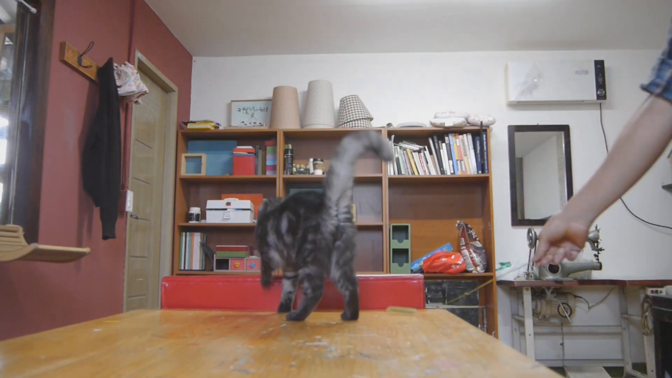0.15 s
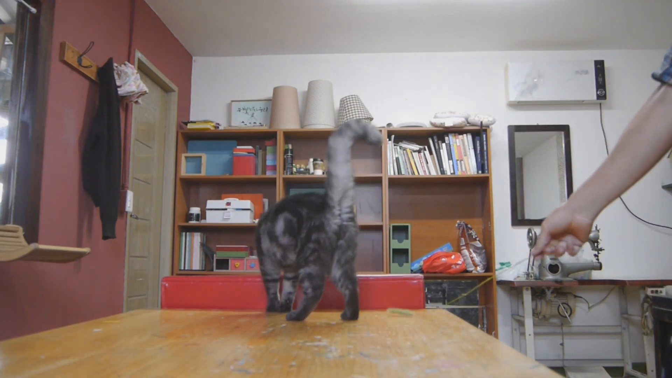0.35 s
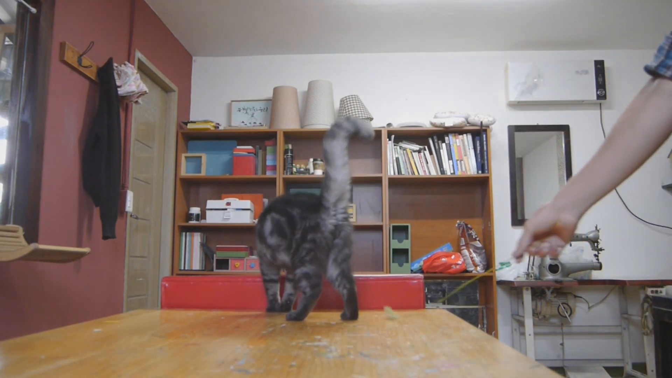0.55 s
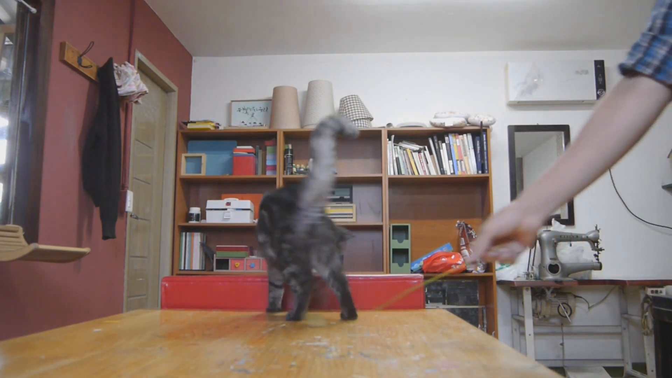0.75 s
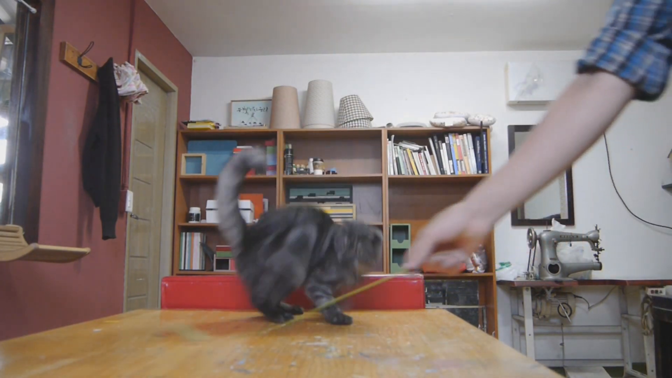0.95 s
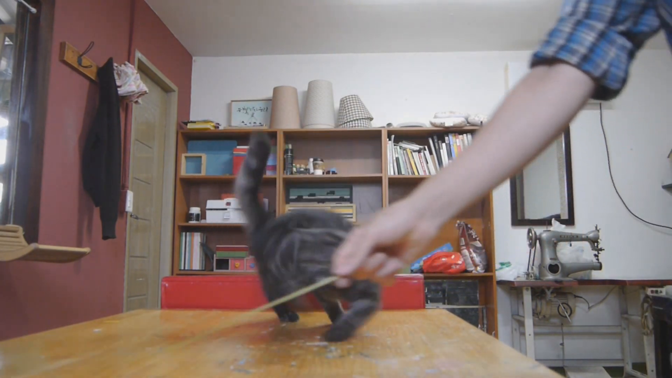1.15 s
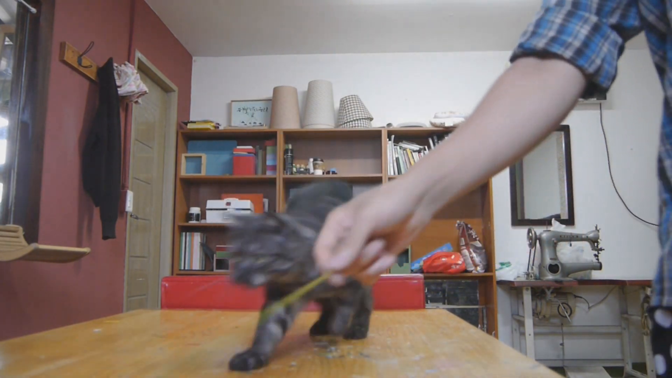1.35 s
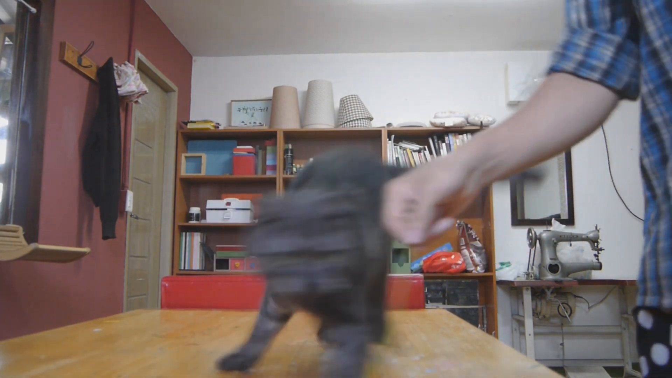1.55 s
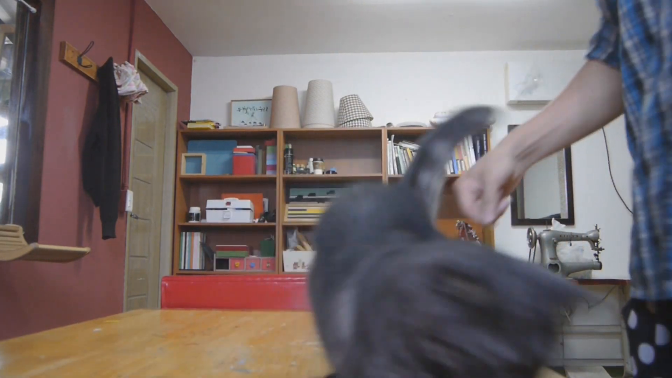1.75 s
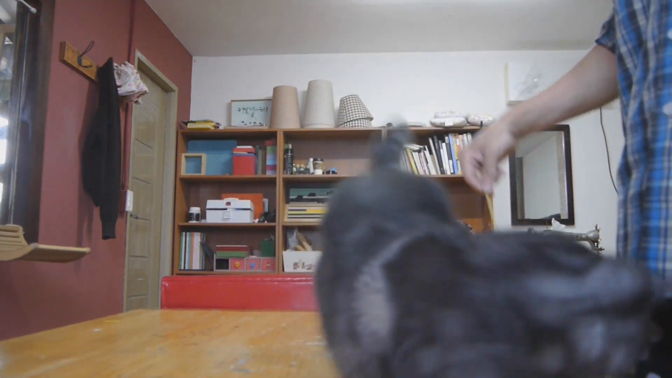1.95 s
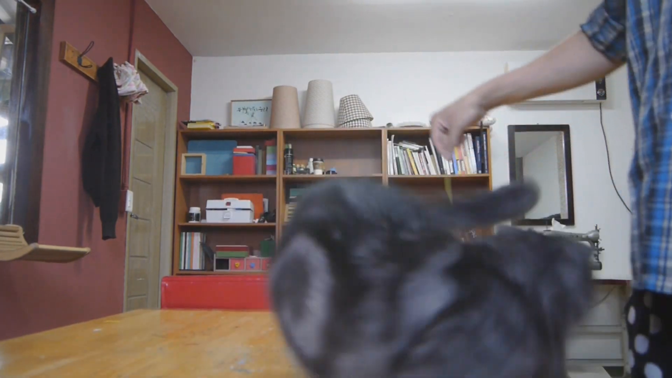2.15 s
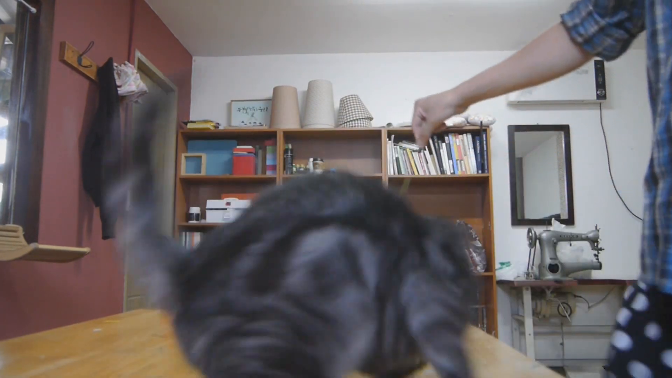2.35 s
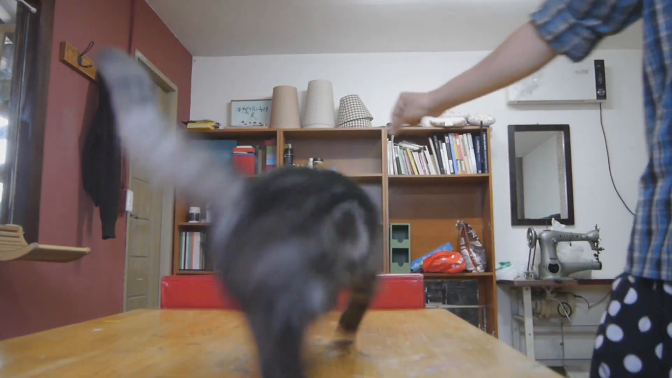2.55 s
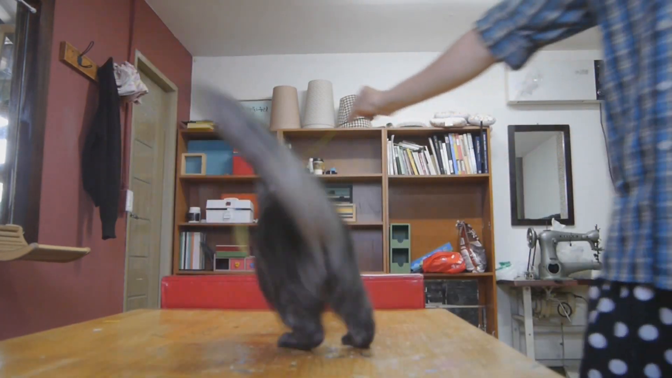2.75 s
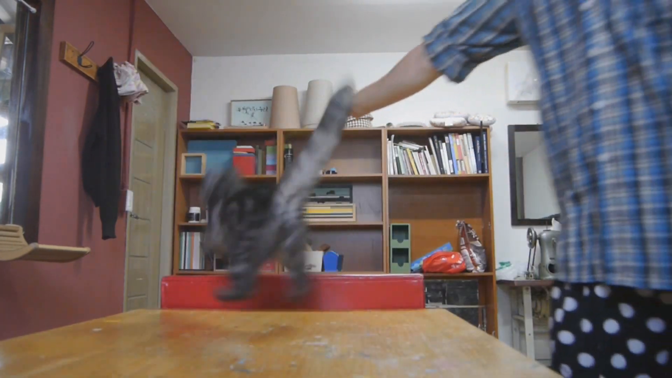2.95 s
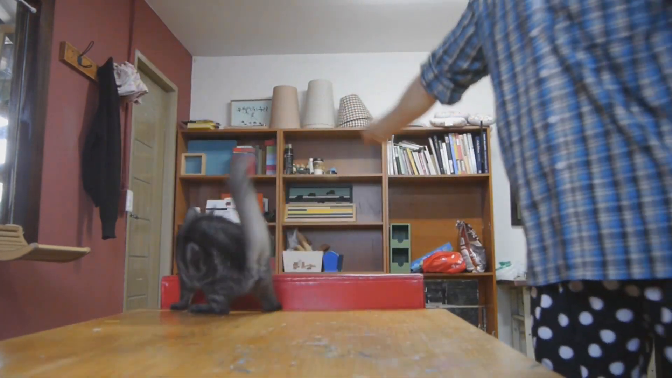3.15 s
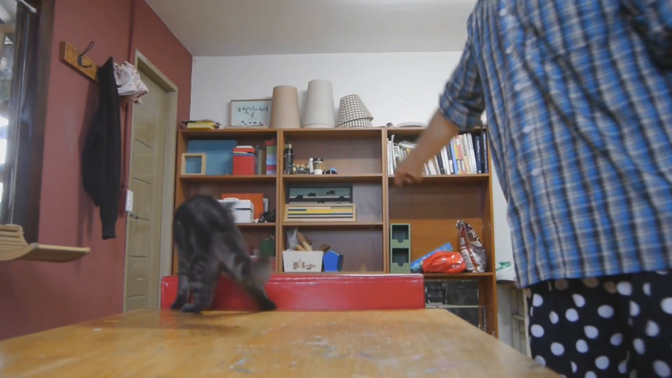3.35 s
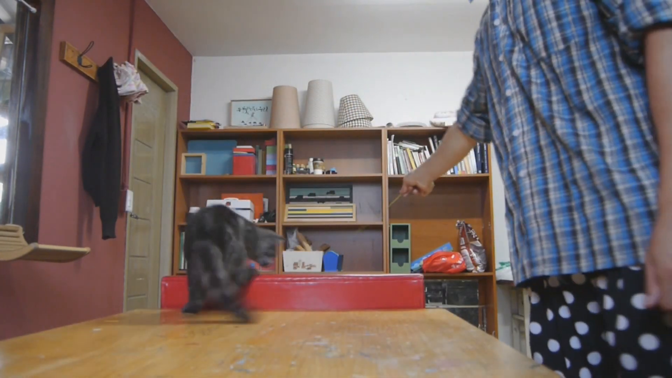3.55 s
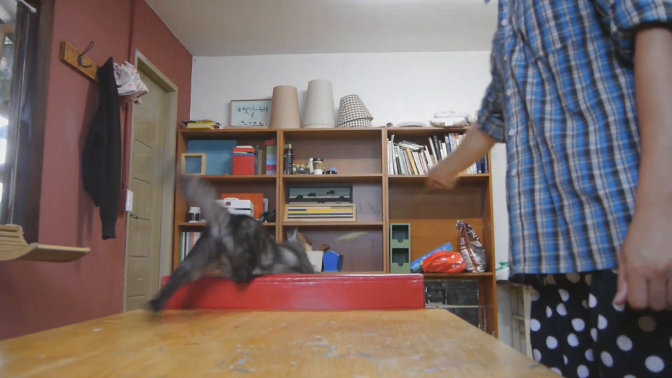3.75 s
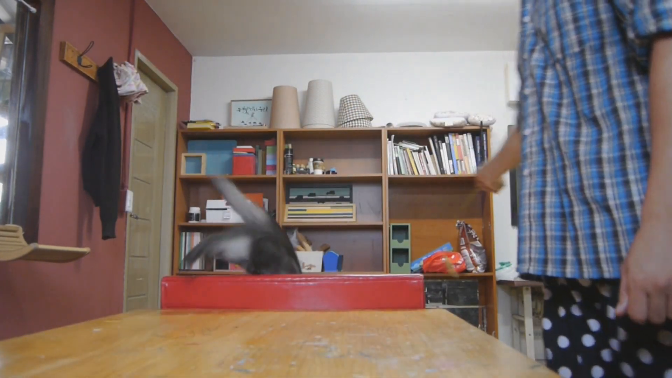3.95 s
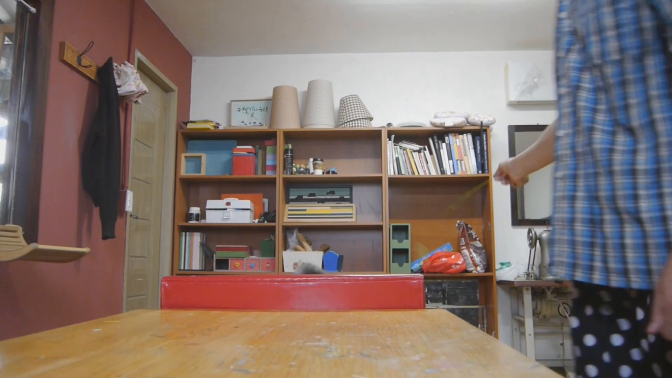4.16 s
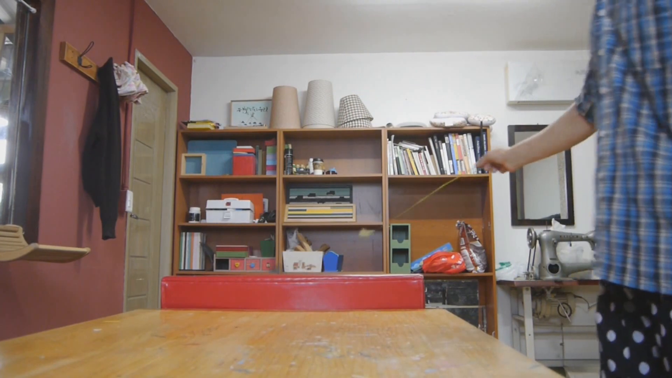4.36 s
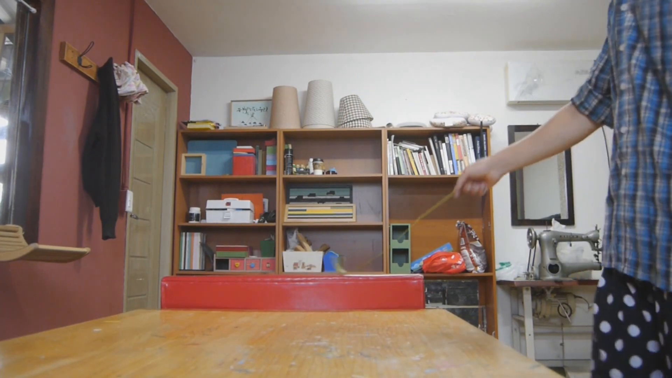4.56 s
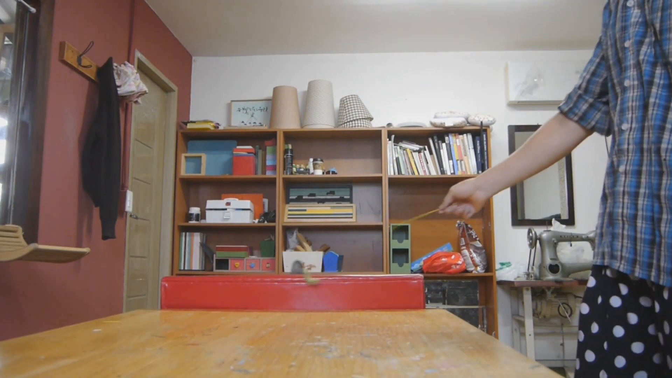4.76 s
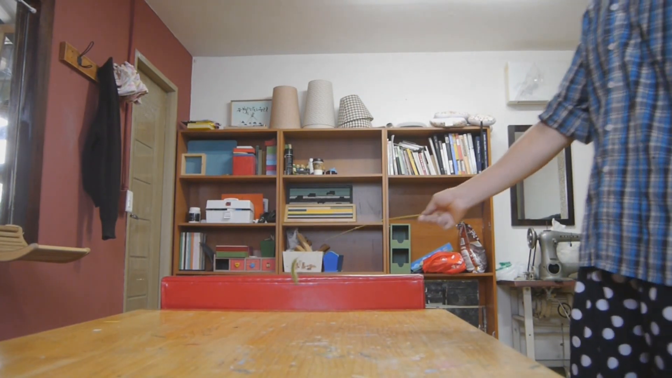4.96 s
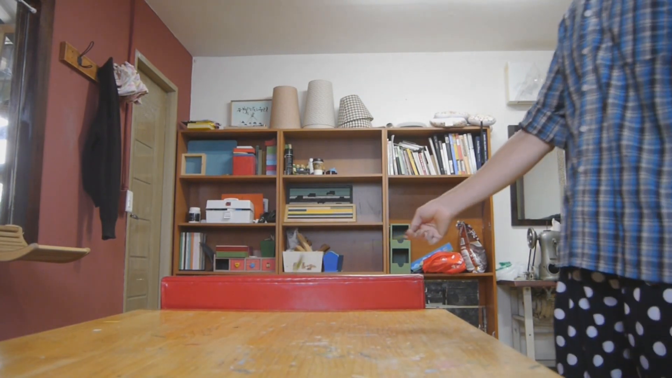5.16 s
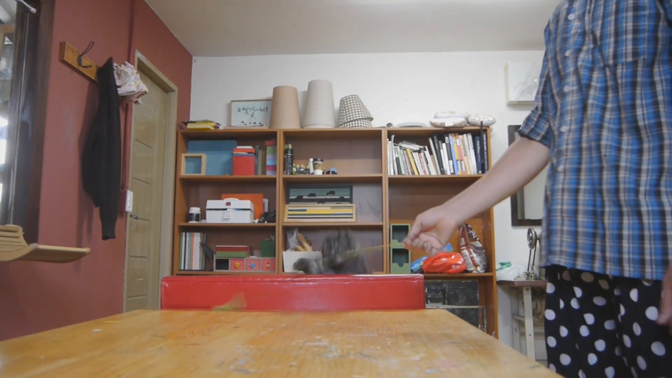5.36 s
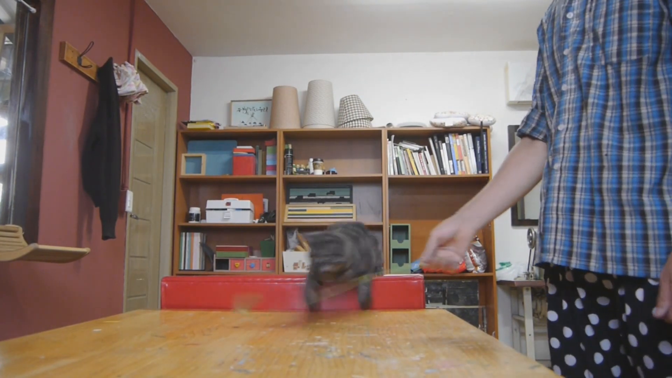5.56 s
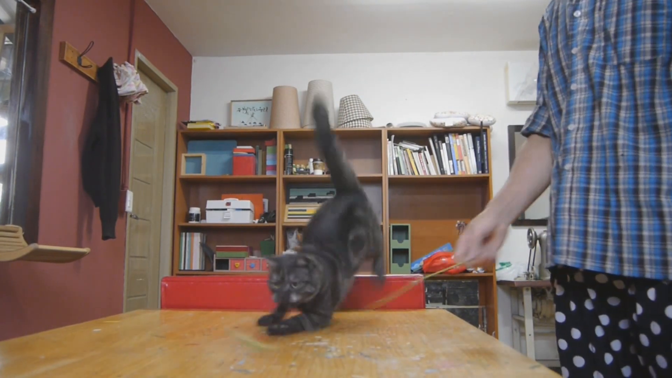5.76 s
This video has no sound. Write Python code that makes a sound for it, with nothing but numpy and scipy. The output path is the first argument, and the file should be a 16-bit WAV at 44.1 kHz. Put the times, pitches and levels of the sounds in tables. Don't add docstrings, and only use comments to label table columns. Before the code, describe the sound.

Close stereo microphones standing on a wooden table catch a cat at play: a soft first touch with faint birds, near quiet, a landing at one second, then growing scrabbling with claw ticks and firm knocks. Two heavy thumps stand out, near 1.8 and 3.15 seconds. It fades to sparse faint brushes, then thuds and skids return at the end in a small, lightly echoing room.

```python
import sys
import numpy as np
from scipy import signal
from scipy.fft import rfft, irfft, next_fast_len
from scipy.io import wavfile
from scipy.ndimage import uniform_filter1d

SR = 44100
rng = np.random.default_rng(int(sys.argv[2]) if len(sys.argv) > 2 else 0)


def natural_amplitude(level_db):
    exponent = np.asarray(level_db, float) / 20
    return 10 ** exponent


def pcm_store(signal):
    levels = np.round(np.clip(np.atleast_2d(signal), -1, 1) * 32767)
    wavfile.write(sys.argv[1], SR, levels.astype(np.int16).T)


N = 256220

# (time [s], peak level [dB], contact length [s], favoured board pitch [Hz])
TAPS = [
    (1.0358, -18.5, 0.0066, 1030),
    (1.433, -55, .008, 950),
    (1.828, -15, 0.012, 805),
    (2.668, -27, 0.015, 930),
    (2.69, -26, 0.039, 1410),
    (2.731, -17.5, 0.0078, 990),
    (3.148, -12.5, 0.011, 810),
    (4.1205, -25.5, 0.0058, 1000),
    (5.589, -24.5, 0.0078, 880),
    (5.646, -27, 0.0079, 950),
]
# (time [s], peak level [dB], contact length [s], favoured board pitch [Hz])
SLAPS = [(.001, -30, 0.042, 310), (1.04, -19, 0.023, 336), (1.09, -28.5, 0.027, 308),
         (1.827, -4, 0.0026, 432), (1.838, -21, 0.015, 335), (2.859, -28.5, 0.027, 800),
         (3.149, -7, 0.0095, 400), (3.1714, -10.5, 0.0044, 395), (4.436, -36.5, 0.017, 160),
         (5.348, -28.5, 0.0077, 247), (5.5885, -17, 0.004, 460), (1.05, -27.5, 0.05, 130),
         (1.49, -36, 0.033, 130), (2.89, -33, 0.033, 133), (5.781, -20, 0.026, 148)]
# (time [s], peak level [dB], contact length [s], favoured board pitch [Hz])
STEPS = [(.903, -47, 0.041, 540), (1.288, -33.5, 0.0074, 343), (1.465, -30.5, 0.037, 385),
         (1.661, -32, 0.018, 380), (1.807, -21, 0.014, 517), (1.887, -19, 0.013, 310),
         (2.184, -23.5, 0.033, 432), (2.353, -29, 0.052, 666), (2.463, -20, 0.011, 850),
         (2.485, -21, 0.022, 296), (2.568, -22, 0.016, 1150), (2.745, -31, 0.013, 136),
         (3.119, -34, 0.011, 340), (3.153, -8.5, 0.0034, 138), (3.186, -23, 0.034, 174),
         (3.262, -21.5, 0.037, 385), (3.488, -35.5, 0.019, 402), (3.679, -42, 0.018, 343),
         (4.018, -44.5, 0.035, 660), (4.139, -25.5, 0.016, 198), (4.362, -38.5, 0.13, 1080),
         (4.625, -43, 0.029, 266), (5.118, -39.5, 0.017, 400), (5.135, -37, 0.0076, 195),
         (5.365, -26.5, 0.027, 295), (5.609, -29, 0.062, 325), (5.775, -19.5, 0.013, 1010)]


def landings():
    return (paws(TAPS, hardness=0.71, focus_db=64, floor_db=-50)
            + paws(SLAPS, hardness=0.85, focus_db=23, floor_db=-20)
            + paws(STEPS, hardness=0.32, focus_db=17.5, floor_db=-20))


# (time [s], peak level [dB], contact length [s], pitch [Hz])
RAPS = [(1.056, -30, .008, 1730), (1.066, -38, 0.0065, 3520), (1.098, -33, .006, 1160),
        (2.179, -21, 0.024, 1960), (1.633, -50, 0.0029, 1830), (1.722, -28, 0.0042, 2300),
        (2.69, -24.5, .008, 1520), (2.706, -24, 0.0086, 1140), (2.731, -20, 0.0056, 1620),
        (3.149, -17.5, 0.0087, 1560), (3.154, -18, .01, 706), (3.176, -22, 0.0049, 1120),
        (4.37, -48, 0.017, 950), (5.356, -36.5, 0.0072, 1170)]
# (time [s], peak level [dB], contact length [s], pitch [Hz])
SETTLES = [(.003, -29, 0.018, 314), (1.064, -26, 0.016, 302), (1.105, -35, 0.0073, 422),
           (3.163, -15.5, 0.011, 163), (3.184, -21.5, 0.011, 397), (3.227, -20.5, 0.0052, 328),
           (4.422, -29.5, 0.024, 168), (4.614, -41.5, 0.0098, 327), (5.138, -30.5, 0.035, 218),
           (5.384, -28.5, 0.0091, 206), (1.834, -22, 0.012, 143), (1.838, -18, 0.017, 516),
           (2.875, -39, 0.015, 133), (4.46, -35, 0.0076, 220), (2.463, -15.5, 0.0094, 750),
           (5.778, -24, 0.0059, 1050)]
# (time [s], peak level [dB], contact length [s],
# pitch [Hz])
MORE_RAPS = [(1.145, -34, .012, 2100), (1.19, -37, 0.014, 1240), (1.195, -43.5, .012, 3100),
             (1.345, -41, .01, 1100), (1.434, -48, .008, 2500), (2.4, -40, .006, 1600), (2.352, -28, 0.011, 800),
             (2.759, -26.5, .001, 1300), (2.88, -31.5, .012, 990), (3.674, -51, 0.0038, 3600),
             (3.676, -48, .005, 2400), (3.694, -47.5, .006, 3100), (3.785, -36, 0.021, 520),
             (3.93, -42, 0.028, 3200), (4.01, -45, .01, 1000), (4.111, -38, 0.0028, 500),
             (4.13, -39.5, 0.014, 3100), (4.166, -27.5, 0.0043, 620), (3.9, -40.5, .004, 950),
             (5.358, -41, .005, 2100), (5.66, -32, .008, 3200), (5.596, -49, 0.0082, 2240),
             (1.433, -39.5, .01, 950), (2.473, -14.5, 0.0012, 740), (3.17, -13, .001, 600),
             (5.7755, -24, .003, 1120), (4.505, -44, .008, 240), (3.535, -48, .01, 1160),
             (5.595, -20, .002, 450), (4.922, -51, 0.006, 3500), (5.52, -44, 0.0056, 290),
             (2.715, -29, 0.019, 1100), (1.67, -38, 0.013, 770), (1.74, -33, 0.011, 4300)]


def small_touches():
    spot = dict(focus_db=65, floor_db=-24, spread_db=2.0, board_share=0.17)
    return (paws(RAPS, hardness=0.68, **spot) + paws(SETTLES, hardness=0.15, **spot)
            + paws(MORE_RAPS, hardness=0.7, **spot))


def paws(blows, hardness, **board):
    out, t = np.zeros(N), np.arange(4000) / SR
    swell = 1 - np.exp(-t / (0.0061 * (1 - hardness) ** 2 + 1e-4))
    for s, peak_db, length, pitch_hz in blows:
        force = rng.standard_normal(4000) * np.exp(-t / max(length, 0.001)) * swell
        force[0] += 10.5 * hardness ** 2
        add(out, s, natural_amplitude(peak_db) * knock(force, pitch_hz, ring_share=0.76, **board))
    return out


# (time [s], peak level [dB], pitch [Hz], length [s])
TICKS = [(1.06, -54, 3750, 0.0091), (1.726, -29, 2300, 0.0091), (1.827, -29, 2000, 0.0028),
         (2.104, -36.5, 3330, 0.049), (2.1737, -10, 1780, 0.0065), (2.465, -13, 2980, 0.0088),
         (3.121, -33.5, 3800, 0.014), (3.149, -20, 1900, 0.0052), (3.93, -57, 3100, 0.025),
         (4.114, -44, 3000, 0.006), (5.5885, -28, 3700, 0.0022), (5.646, -26, 1940, 0.029),
         (5.774, -27, 2780, 0.0076)]


def claws():
    out, t = np.zeros(N), np.arange(2000) / SR
    for s, peak_db, pitch_hz, length in TICKS:
        force = rng.standard_normal(2000) * np.exp(-t / max(length, 0.0005))
        force[0] += 5.5
        hit = knock(force, pitch_hz, ring_share=0.3, focus_db=74.0, floor_db=-4.0, thud_db=-15.0)
        add(out, s, natural_amplitude(peak_db) * hit)
    return out


# (frequency [Hz], level [dB], decay time t60 [s])
BOARD = [(127.8, -4.5, 0.13), (159, -10, 0.18), (195, -29, 0.076), (240.3, 2, 0.079), (282.4, -18, 0.11),
         (335.2, 5, 0.082), (390.3, 9.5, 0.084), (432, 1, 0.04), (492, -10, 0.11), (565, -0.5, 0.045),
         (637, -27, 0.17), (706, 15.5, 0.021), (754, -2, 0.029), (870, -2, 0.026), (920, 7, 0.025),
         (1010, -2, 0.035), (1160, -16, 0.032), (1328, -5, 0.054), (1520, 11.5, 0.02), (1620, 12, 0.021),
         (1860, 20, 0.014), (2228, -2, 0.039), (2530, 25, 0.0091), (3065, -18, 0.035), (3520, 10.5, 0.059),
         (3800, 17, 0.01), (4100, -22, 0.015)]
WAVES = np.sin(2 * np.pi * np.array(BOARD)[:, :1] * np.arange(SR // 5) / SR)


def knock(force, pitch_hz, ring_share, focus_db, floor_db, spread_db=6.0, thud_db=-15.5, board_share=1):
    t, (hz, level_db, t60) = np.arange(SR // 5) / SR, np.transpose(BOARD)
    near_db = np.maximum(-focus_db * np.log2(hz / pitch_hz) ** 2, floor_db)
    chance_db = spread_db * rng.standard_normal(len(BOARD))
    modes = WAVES * np.exp(-np.log(1000) * t / (t60[:, None] * ring_share))
    ringing = natural_amplitude(board_share * level_db + near_db + chance_db) @ modes
    force = part(force, pitch_hz / 2.8, min(2.6 * pitch_hz, 9000), order=2)
    hit = top_one(signal.fftconvolve(force, ringing))
    hit[:len(force)] += natural_amplitude(thud_db) * top_one(force)
    return top_one(hit)


# (time [s], claw level [dB], time to fade 20 dB [s],
# board pitch [Hz], pad rub relative to claw [dB])
SKIDS = [(0., -40.5, 0.0535, 680, 11), (0.966, -47, 0.17, 1620, -2), (1.06, -35, 0.05, 920, -3),
         (1.336, -48.5, 0.22, 1830, 4.5), (1.433, -44, 0, 1000, -2), (1.468, -37.5, 0.29, 1160, 4.5),
         (1.634, -40, 0.3, 1670, -12), (1.723, -32, 0.24, 2020, -24), (1.84, -45.5, 0.17, 720, 16.5),
         (2.177, -31.5, 0.27, 1600, 13), (2.353, -43.5, -0.03, 900, 9), (2.86, -30, 0.1355, 1010, -6),
         (3.12, -46, 0.3, 690, -2), (3.146, -31, 0.16, 695, 12), (3.675, -50.5, 0.24, 850, 9),
         (3.736, -39, 0.29, 2260, -2), (3.92, -41.5, 0.14, 2840, -4.5), (4.121, -36.5, 0.19, 880, 9),
         (5.352, -45.5, 0.23, 980, 16), (5.587, -46, -0.25, 680, 10), (5.648, -37, 0.04, 1110, 11),
         (5.774, -30.5, 0.2, 1060, 6.5)]
# (peak time [s], claw level [dB], time to fade 20 dB [s],
# board pitch [Hz], pad rub relative to claw [dB])
SWIPES = [(1.146, -40, 0.23, 1820, 0), (1.199, -50, 0.13, 1360, 9), (1.545, -40, -0.13, 1160, 9.5),
          (1.791, -31, 0.1, 780, -1), (1.94, -41.5, 0.1, 860, 0), (2.134, -44, 0.34, 1470, 7.5),
          (2.226, -31, 0.15, 1520, -8), (2.413, -29.5, 0.19, 1420, 5), (2.474, -20, 0.06, 870, -7),
          (2.584, -30.5, 0.16, 1150, -1.5), (2.7, -34.5, 0.12, 1310, 9), (2.743, -33.5, 0.13, 1180, 7),
          (2.92, -65, 0.7, 1550, 1.5), (2.98, -44, 0.1, 766, 8.5), (3.015, -42, .04, 1550, -2),
          (3.22, -36, 0.176, 690, 4.5), (3.3, -42, 0.14, 690, 0), (3.776, -32.5, 0.09, 1930, -2),
          (4.372, -48, 0.13, 920, 11), (4.458, -47.5, 0.07, 860, 10), (4.61, -53, 0.15, 1160, -12),
          (5.095, -48.5, 0.06, 800, 13.5), (5.148, -47.5, 0.35, 1000, 10), (5.55, -56.5, 1, 710, 6),
          (5.805, -33.5, 0.03, 1600, 3), (3.499, -53, 0.1, 1200, 13), (5.67, -41, 0.14, 1880, 15),
          (3.93, -42, -0.04, 3000, -15), (4.16, -44.5, 0.14, 2490, 1), (2.39, -29, -0.35, 1530, -3),
          (1.07, -42, -0.03, 1500, 8), (5.3, -51, -0.54, 1000, -15), (1.36, -46, 0.12, 1100, 1.5),
          (4.125, -40, 0.02, 3000, -7), (2.675, -37.5, 0.05, 910, 4), (4.5, -51, -0.14, 900, 12),
          (1.58, -42.5, 0, 1100, -3), (1.66, -40.5, 0.02, 1700, -21), (1.94, -45, 0, 2500, -3)]
# (time [s], level [dB], time to fade 20 dB [s])
SHOVES = [(0., -28, 0.13), (1.05, -33, -0.13), (1.29, -33, 0.36), (1.49, -25, -0.62), (1.76, -24.5, 0.3),
          (1.84, -18.5, 0.29), (2.21, -18.5, 0.17), (2.54, -23.5, 0.3), (2.77, -18.5, 0.01),
          (2.88, -26, 0.3), (3.15, -17, 0.07), (3.22, -24.5, 0.36), (3.3, -24, 0), (3.46, -30.5, 0.2),
          (3.74, -35.5, 0.2), (3.81, -39, 0.35), (4.13, -21.5, 0.155), (4.46, -36.5, 0.64),
          (5.15, -32.5, 0.6), (5.37, -23, 0.12), (5.62, -21, 0.26), (5.79, -17, -1.5)]
# (time [s], claw level [dB])
STIR = [(0, -56), (.5, -83), (.89, -70.5), (1.0, -58), (2.8, -56), (3.6, -63), (4.0, -61.5), (4.55, -59),
        (4.8, -66), (5.0, -60.5), (5.81, -56.5)]
# (time [s], level [dB])
COAT = [(0, 1.5), (1.1, 0.5), (1.3, -2.5), (1.5, 2), (1.6, 0), (1.7, 1), (1.75, 0.5), (2.3, -0.5),
        (3.15, 1), (3.27, 4.5), (3.4, 1.5), (3.6, 2.5), (3.75, 1), (3.9, 3.5), (4.05, 0.5), (4.2, 2.5),
        (4.7, 2.5), (5.2, 2.5), (5.4, 1)]


def motion():
    when = np.arange(0, N, 32) / SR
    stir = natural_amplitude(2 * in_time(STIR, when)[0])
    power = np.vstack([strokes(SKIDS, rise_share=0.013, grip=1),
                       strokes(SWIPES, rise_share=0.62, grip=1.12), stir])
    stir_row = (950, -3.5)
    pitch_hz, pad_db = np.array([row[3:] for row in SKIDS + SWIPES] + [stir_row]).T
    fur_db = np.append(-6.5 - 0.27 * pad_db[:-1], -4.5)
    claw = power.sum(0)
    drag = strokes(SHOVES, rise_share=0.33).sum(0) + natural_amplitude(2 * 12.5) * stir
    pad = natural_amplitude(2 * pad_db) @ power
    fur = natural_amplitude(2 * fur_db) @ power * natural_amplitude(2 * in_time(COAT, when)[0])
    levels_db = 10 * np.log10([claw, drag, pad, fur])
    place_hz = np.exp(np.log(pitch_hz) @ power / claw)
    return in_time(np.transpose([when, *levels_db, place_hz]))


def strokes(rows, rise_share, grip=1):
    s, level_db, fade_s = np.array([row[:3] for row in rows]).T[:, :, None]
    t = (np.arange(0, N, 32) / SR - s) / np.maximum(fade_s, 0.01)
    away = np.where(t < 0, -t / rise_share, t)
    return natural_amplitude(2 * (level_db - 20 * away ** grip))


# (frequency [Hz], density [dB per Hz])
DRAG = [(24, -44.5), (40, -41), (126, -6.5), (193, -8), (326, -5.5), (594, -6), (842, 8), (979, -15),
        (1080, 2), (1290, -14), (5620, -16.5), (6900, -25.5), (7900, -26.5), (11600, -36), (15700, -48.5)]
# (time [s], level [dB])
SHEEN = [(0, 0), (1.2, 0), (1.4, -3), (1.68, -6.5), (1.75, -1), (2.3, -2), (2.9, -1), (3.25, 0.5), (3.5, 1),
         (3.8, -1), (3.93, 1), (4.05, 2), (4.2, 4.5), (4.7, 2.5), (5.2, 2), (5.8, -0.5)]


def sliding(moves):
    claw_db, drag_db, pad_db, fur_db, pitch_hz = moves
    coarse, fine = slips(2500, size_db=4.0), slips(14000, size_db=3.0)
    board, place = np.zeros(N), np.zeros(N)
    for k, (hz, _, t60) in enumerate(BOARD[:18]):
        board += ring(coarse, hz, t60) / np.sqrt(t60) * (-1) ** k
    for hz, _, t60 in BOARD[10:]:
        near = natural_amplitude(-19.0 * np.log2(hz / pitch_hz[::64]) ** 2)
        place += ring(coarse * np.repeat(near, 64)[:N], hz, t60) / np.sqrt(t60)
    place = place / np.sqrt(uniform_filter1d(place ** 2, 4000) + 1e-9)
    place_db = uniform_filter1d(np.where(pitch_hz < 1500, pad_db, claw_db), 200) - 7.5
    wood = colour(rms_one(coarse) + natural_amplitude(-2.0) * rms_one(board), DRAG)
    grain = patchy(colour(rms_one(fine) + 0.4 * rms_one(coarse), DRAG))
    return (natural_amplitude(drag_db - 15.0) * part(wood, low_hz=79.5, high_hz=485)
            + natural_amplitude(pad_db - 17.0) * part(wood, low_hz=460, high_hz=1900)
            + natural_amplitude(place_db) * place
            + natural_amplitude(claw_db - 2.5) * part(grain, low_hz=1600, high_hz=4080, order=2)
            + natural_amplitude(fur_db - 0.8) * part(grain, low_hz=4466, high_hz=7140, order=2)
            + natural_amplitude(fur_db + in_time(SHEEN)[0] - 10.5) * part(grain, low_hz=7500, high_hz=14960))


def slips(per_s, size_db):
    sizes = natural_amplitude(size_db * np.minimum(rng.exponential(1, N), 3.5)) * rng.choice([-1, 1], N)
    return sizes * (rng.random(N) < per_s / SR)


def ring(force, hz, t60):
    r, w = natural_amplitude(-60 / (t60 * SR)), 2 * np.pi * hz / SR
    return signal.lfilter([0, np.sin(w)], [1, -2 * r * np.cos(w), r * r], force)


def patchy(x):
    cells = signal.stft(x, nperseg=256)[2]
    field = rng.standard_normal(cells.shape)
    for axis, size in enumerate([3, 8]):
        for _ in range(2):
            field = uniform_filter1d(field, size, axis=axis)
    return signal.istft(cells * natural_amplitude(1.63 * rms_one(field)), nperseg=256)[1][:N]


def shaking(moves):
    effort_db = uniform_filter1d(np.mean(moves[:2], axis=0), 3000)
    noises = rng.standard_normal((2, N))
    return natural_amplitude(-35 + 0.74 * effort_db) * np.array([part(w, 43.4, 104, order=2) for w in noises])


# (time [s], frequency [Hz], level [dB])
WHISTLE = [
    (2.97, 11300, -84),
    (3.015, 12100, -68),
    (3.05, 13100, -70),
    (3.075, 14000, -77),
    (3.11, 13400, -76),
    (3.155, 12600, -66),
    (3.17, 12500, -90),
]


def toy():
    return warble(WHISTLE, width_hz=50)


# (frequency [Hz], ratio [dB])
SPREAD = [(60, -24), (110, -37), (200, -65), (380, -20.5), (700, -17), (1290, -4.5), (2380, -5.5),
          (4400, 3), (8120, 0.5), (15000, 0.5)]


def room(x, beside, echo, side_echo):
    mid = x + signal.fftconvolve(x, echo)[:N]
    return mid, colour(signal.fftconvolve(beside, side_echo)[:N], SPREAD)


def walls():
    mid = natural_amplitude(-11.0) * tail(0.8, onset_s=0.0043)
    side = natural_amplitude(-1.5) * tail(0.026, onset_s=0.00081) + natural_amplitude(-13.5) * tail(0.55, onset_s=0.005)
    return mid, side


# (frequency [Hz], decay time t60 [s])
ROOM_T60 = [(100, 0.78), (400, 0.4), (1500, 0.41), (5000, 0.42), (15000, 0.54)]


def tail(t60_share, onset_s):
    t = np.arange(SR // 2) / SR
    out = np.zeros(len(t))
    for low_hz in 60 * 2. ** np.arange(8):
        band = band_pass(rng.standard_normal(len(t)), low_hz, 2 * low_hz, order=2)
        out += band * natural_amplitude(-60 * t / (t60_share * at_hz(ROOM_T60, 1.13 * low_hz)))
    out = out * (1 - np.exp(-t / onset_s))
    return out / np.sqrt(np.sum(out ** 2))


# (time [s], level [dB], start pitch [Hz], length [s])
BIRDS = [
    (0.044, -53.5, 4260, 0.038),
    (0.113, -56.5, 4230, 0.042),
    (.16, -66, 3900, .015),
    (0.186, -60, 4100, 0.026),
    (.225, -66, 3930, 0.028),
    (0.324, -62, 3970, 0.023),
    (0.362, -61, 4000, 0.03),
]


def birds():
    out, fall_hz_per_s = np.zeros(N), 18500
    for s, db, start_hz, length in BIRDS:
        t = np.arange(round(length * SR)) / SR
        chirp = np.sin(2 * np.pi * (start_hz * t - fall_hz_per_s * t ** 2 / 2))
        add(out, s, natural_amplitude(db) * np.hanning(len(t)) * chirp)
    return out


# (time [s], frequency [Hz], level [dB])
TRILL = [
    (.74, 4850, -93),
    (.78, 4850, -74),
    (.82, 4850, -93),
    (.9, 4870, -72.5),
    (1.0, 5240, -110),
    (4.3, 4660, -143),
    (4.65, 4850, -73.5),
    (4.8, 4850, -94),
]
# (time [s], frequency [Hz], level [dB])
TRILL_HIGH = [
    (3.42, 6670, -90),
    (3.53, 6700, -71),
    (3.68, 6740, -78),
    (3.8, 6760, -90),
    (4.6, 6600, -91.5),
    (4.75, 6730, -74),
    (4.95, 6530, -77.5),
    (5.05, 6600, -91),
]


def insects():
    return warble(TRILL, width_hz=150) + warble(TRILL_HIGH, width_hz=250)


# (time [s], frequency [Hz], level [dB])
HUM = [
    (4.3, 973, -60.5),
    (4.7, 960, -64.5),
    (5.0, 948, -64),
    (5.1, 970, -85),
]


def household():
    return warble(HUM, width_hz=38)


def warble(rows, width_hz):
    hz, db = in_time(rows)
    low_pass = signal.butter(2, width_hz, fs=SR, output="sos")
    slow = signal.sosfilt(low_pass, rng.standard_normal((2, N)))
    carrier = np.exp(2j * np.pi * np.cumsum(hz) / SR)
    sounding = (np.arange(N) > rows[0][0] * SR) & (np.arange(N) < rows[-1][0] * SR)
    return natural_amplitude(db) * sounding * rms_one(np.real((slow[0] + 1j * slow[1]) * carrier))


# (frequency [Hz], density [dB per Hz])
AIR = [(24, -52), (40, -20), (213, -3.5), (369, -5.5), (429, -5.5), (486, -7.5), (908, -7), (1170, -11),
       (1570, -14), (2070, -20.5), (3010, -23), (10800, -34), (13800, -37), (15700, -38)]
# (frequency [Hz], ratio [dB])
AIR_SIDE = [(60, -23), (110, -6), (200, -7), (380, 0.5), (700, 0.5), (1290, 4.5), (2380, 10), (4400, 6),
            (8120, 4), (15000, 2)]


def room_air():
    white = rng.standard_normal((2, N))
    mid = colour(white[0], AIR)
    level = natural_amplitude(-60.5) / np.std(mid)
    return level * mid, level * colour(white[1], AIR, AIR_SIDE)


def add(out, s, sound):
    at = round(s * SR)
    out[at:at + len(sound)] += sound[:N - at]


def rms_one(x):
    return x / np.sqrt(np.mean(x ** 2) + 1e-20)


def top_one(x):
    return x / np.abs(x).max()


def band_pass(x, low_hz, high_hz, order):
    return signal.sosfilt(signal.butter(order, [low_hz, high_hz], "band", fs=SR, output="sos"), x)


def part(x, low_hz, high_hz, order=3):
    return rms_one(band_pass(x, low_hz, high_hz, order))


def in_time(rows, when=None):
    s, *columns = np.transpose(rows)
    when = np.arange(N) / SR if when is None else when
    return [np.interp(when, s, c) for c in columns]


def at_hz(points, hz):
    point_hz, value = np.transpose(points)
    return np.interp(np.log(hz), np.log(point_hz), value)


def colour(x, *spectra):
    size = next_fast_len(N)
    hz = np.maximum(np.fft.rfftfreq(size, 1 / SR), 1)
    return irfft(rfft(x, size) * natural_amplitude(sum(at_hz(s, hz) for s in spectra)), size)[:N]


def scene():
    moves, echoes = motion(), walls()
    calls = birds()
    far = natural_amplitude(-0.6) * calls + signal.fftconvolve(calls, echoes[0])[:N] + insects() + household()
    points = landings() + small_touches() + claws() + toy() + far
    slide, slide_beside = sliding(moves), sliding(moves)
    heard = room(points + slide, points + slide_beside, *echoes)
    bass_cut = signal.butter(4, 120, "high", fs=SR, output="sos")
    mid, side = signal.sosfilt(bass_cut, heard)
    rumble, air = shaking(moves), room_air()
    mid = mid + air[0] + rumble[0]
    side = side + air[1] + natural_amplitude(-16) * rumble[1]
    return np.array([natural_amplitude(0.25) * (mid + side), mid - side])


def band_limit(x):
    return signal.sosfilt(signal.butter(12, 15810, fs=SR, output="sos"), x)


def record(dry):
    rounded = 1.5 * np.tanh(dry / 1.5)
    top_cut = signal.cheby2(20, 60, 16000, fs=SR, output="sos")
    finished = signal.sosfilt(top_cut, rounded)
    return band_limit(finished)


dry = scene()
out = record(dry)
pcm_store(out)
```